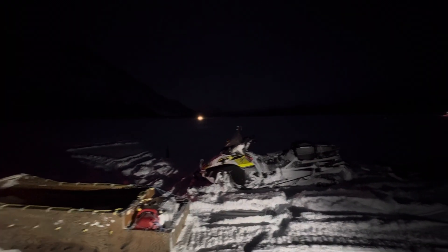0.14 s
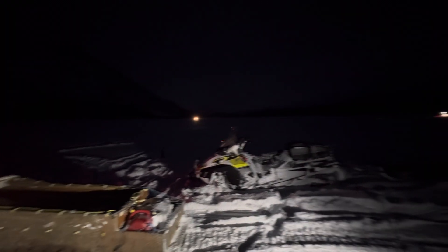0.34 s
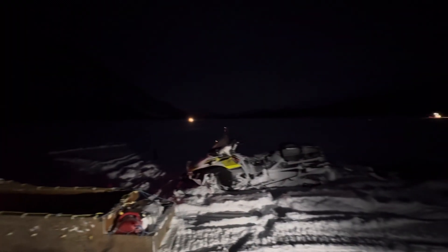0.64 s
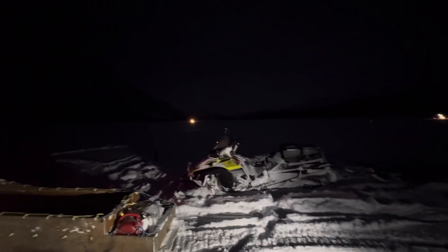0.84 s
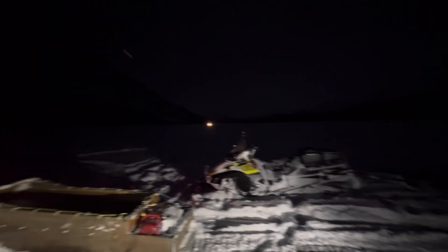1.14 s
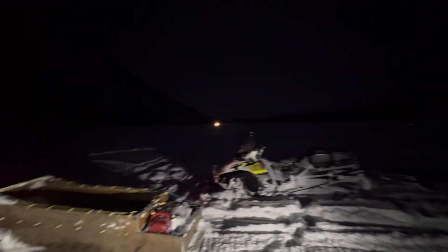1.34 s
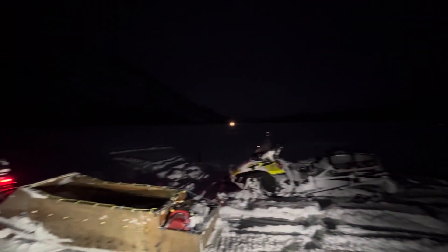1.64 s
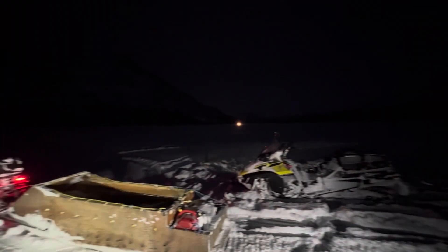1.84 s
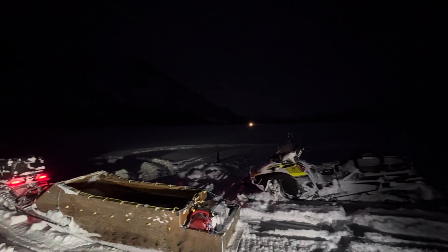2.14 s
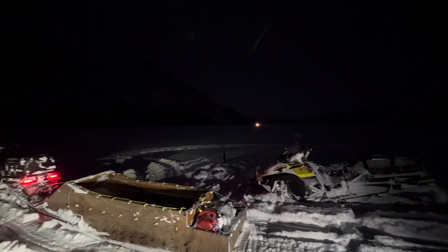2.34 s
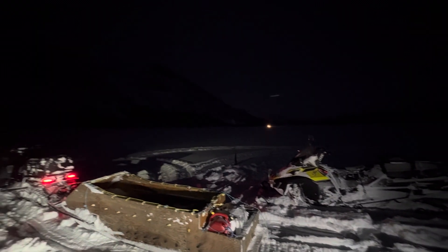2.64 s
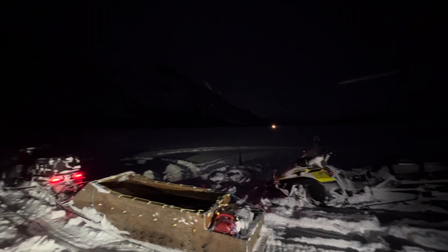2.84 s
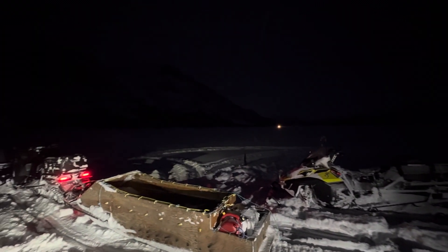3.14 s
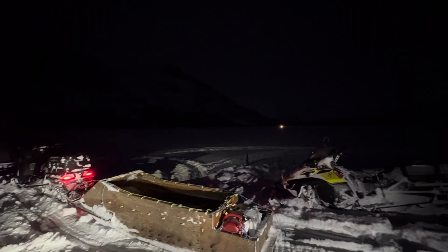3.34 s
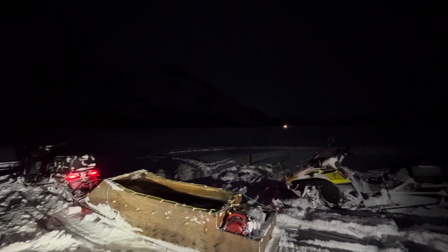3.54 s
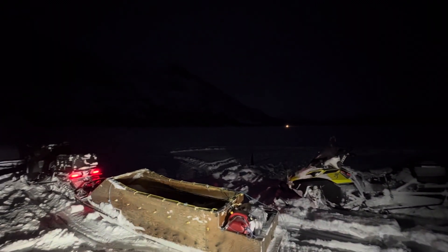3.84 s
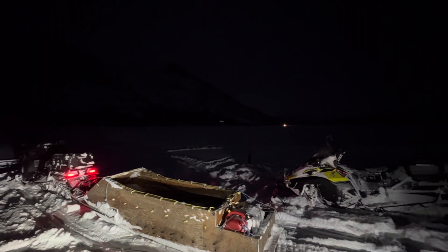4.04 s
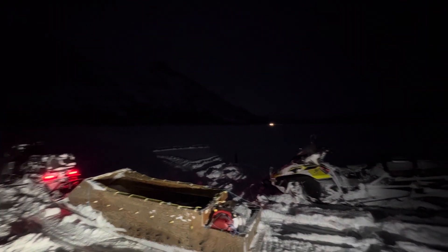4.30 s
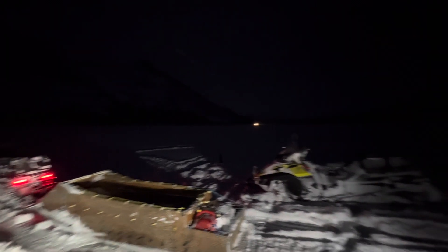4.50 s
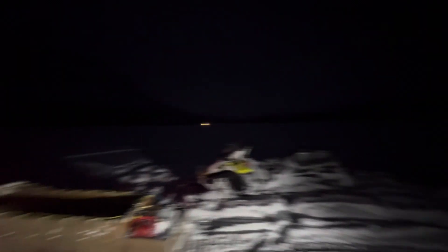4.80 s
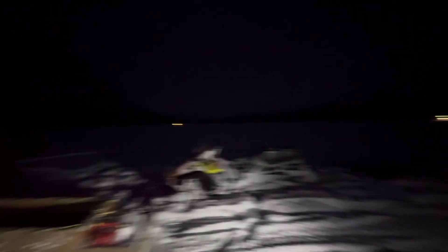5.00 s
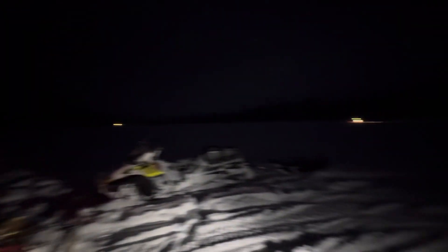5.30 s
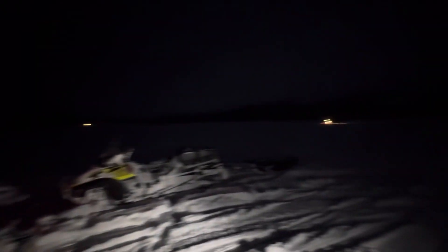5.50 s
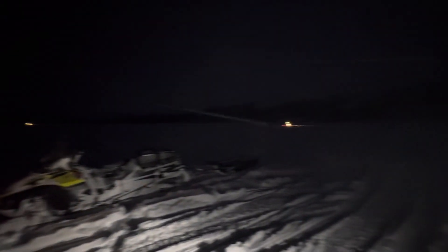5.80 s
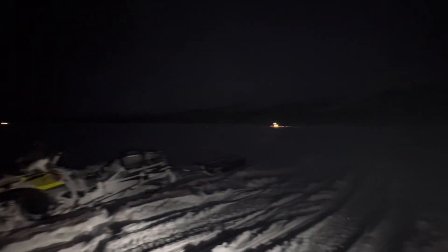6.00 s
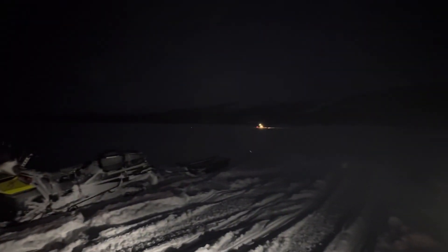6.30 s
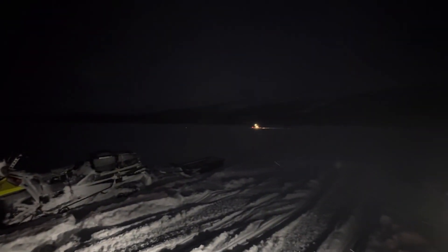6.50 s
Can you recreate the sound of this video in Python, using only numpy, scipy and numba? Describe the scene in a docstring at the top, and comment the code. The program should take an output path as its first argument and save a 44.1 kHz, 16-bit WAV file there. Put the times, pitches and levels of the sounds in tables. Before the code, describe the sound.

A snowmobile idles with a low, steady throb while wind rumbles on the microphone and handling adds scattered taps and dull bumps.

```python
"""A three-cylinder snowmobile idles on open snow at night, some metres from a slowly turning camera.
Its firings drive the exhaust resonances in a low throb and modulate the noise of the engine cover,
the clattering panels and the hissing fan; a valve ticks on every third firing.
Turbulent gusts rumble on the two microphone ports. Something stiff, perhaps a glove or strap,
taps and scuffs the hand-held camera body in irregular runs, among dull bumps."""
import sys
import numpy as np
from scipy import signal
from scipy.io import wavfile
from scipy.ndimage import uniform_filter1d
from numba import njit

SR = 44100
rng = np.random.default_rng(int(sys.argv[2]) if len(sys.argv) > 2 else 0)


def inscribe(sig):
    """Save sig as 16-bit PCM at rate SR to the path in sys.argv[1].

    A 1-D sig is mono; a 2-D sig holds one channel per row.
    Samples are clipped to [-1, 1] before scaling.
    """
    pcm = np.round(np.clip(np.atleast_2d(sig).T, -1, 1) * 32767)
    wavfile.write(sys.argv[1], SR, pcm.astype(np.int16))


N = 293397

# Levels of the exhaust throb and the wind rumble, which swell and fade together:
# (time [s], exhaust level [dB], in-phase wind level [dB])
THROB_AND_RUMBLE = [(0, -25, -28), (.17, -27, -30), (.6, -24, -27), (.8, -21.5, -25), (1.0, -23, -20),
                    (1.36, -24, -21.5), (1.52, -33, -34), (1.85, -29, -35.5), (2.12, -26, -24.5),
                    (2.35, -28.5, -32), (3.4, -33.5, -30), (3.8, -31, -31.5), (4.3, -38, -36),
                    (5.15, -33.5, -38), (5.36, -30, -32.5), (5.46, -31, -31.5), (5.52, -60, -31.5),
                    (5.56, -30.5, -31), (6.08, -29.5, -29), (6.25, -30, -36.5), (6.65, -28, -32.5)]
# Airflow at the ports: (time [s], antiphase wind level [dB], mono bass cutoff [Hz])
PORT_AIRFLOW = [(0, -68, 334), (.85, -31, 226), (1.5, -41.5, 260), (2.9, -44.5, 218), (4.3, -36, 84),
                (5.0, -36.5, 60), (5.4, -25, 41), (5.5, -29, 41), (5.68, -35.5, 604), (5.9, -40.5, 720),
                (6.65, -48, 795)]
# Dull bumps on the camera: (time [s], level [dB], pitch [Hz])
DULL_BUMPS = [(0.922, -13.5, 154), (0.994, -27, 182), (1.112, -14, 87), (1.172, -17, 260),
              (2.796, -23, 360), (3.36, -14.5, 125), (3.506, -22.5, 278), (3.705, -29.5, 335),
              (3.741, -21.5, 485), (3.742, -17, 105.5), (3.813, -28, 610), (3.957, -27, 352),
              (3.976, -29, 583), (3.986, -30.5, 715), (4.058, -33, 537), (4.072, -30.5, 577),
              (4.29, -30.5, 348), (4.618, -24.5, 280), (4.633, -27.5, 400), (5.308, -27, 72),
              (5.355, -28, 79.5), (6.042, -22, 383), (6.423, -23.5, 493), (6.437, -20.5, 530),
              (6.614, -18, 454)]
# Short taps and longer scuffs: (time [s], level [dB], thud gain [dB], treble gain [dB],
# pitch of the hollow under the hand [Hz], contact duration [ms])
TOUCHES = [(2.56, -31, 5.5, -4.5, 807, 5.1), (2.65, -53, 3, -1.5, 800, 21),
           (2.705, -41.5, 16, -11, 1330, 5), (2.724, -37.5, 15, -4, 775, 1.44),
           (2.7445, -43.5, 13.5, -3.5, 610, 4.7), (2.9605, -35.5, 15.5, 2, 510, 5.6),
           (3.124, -58, 11, 4.5, 590, 11), (3.349, -17.5, 8, -5.5, 750, 4.63),
           (3.546, -46.5, 14, -1, 485, 16.8), (3.7581, -29.5, 9.5, -1, 860, 5.2),
           (3.945, -48, 11.5, -1.5, 485, 22), (4.1637, -35, 12, 1, 537, 8.3), (4.346, -34, 4.5, 1, 700, 5),
           (4.493, -37.5, 1, -2, 736, 56), (4.538, -27, 13, -1.5, 680, 4.1),
           (4.711, -50, 10, -3.5, 780, 29), (4.932, -26.5, 8.5, 1, 700, 4.93),
           (5.319, -45, -21, 16.5, 576, 1.9), (5.321, -40.5, -2.5, 2, 1050, 51.6),
           (5.341, -33.5, -9, -8, 1200, 12), (6.203, -46.5, -10, -4, 803, 33)]
# Modes of the camera shell: (frequency [Hz], bandwidth [Hz], gain [dB])
SHELL_LOW_MODES = [(135, 110, -1), (434, 190, 9.5), (721, 110, 6), (1804, 430, 0.5)]
SHELL_MID_MODES = [(2626, 520, 9.1), (3060, 750, 8.3), (4110, 680, 4.7)]
# Treble of the taps, the last row a faint, very high fizz: (frequency [Hz], bandwidth [Hz], gain [dB])
TAP_TREBLE_BANDS = [(5270, 2060, 7.5), (6230, 1130, 9), (8100, 2250, 7.5), (15000, 1100, -3)]
# Engine speed: (time [s], firing rate [Hz])
FIRING_RATE = [(0, 37.45), (1.15, 37.55), (2.2, 38.0), (3.5, 37.5), (4.97, 37.55), (5.25, 37.45),
               (5.6, 36.85), (6.0, 37.2), (6.2, 38.1), (6.65, 38.0)]
# Strength of each cylinder, in firing order: (gain [dB])
CYLINDER_GAINS = [0, 0.43, 0.33]
# Engine levels as the camera turns: (time [s], clatter [dB], tick [dB], whirr [dB], fan [dB], cover [dB])
ENGINE_LEVELS = [(0, -52, -47, -57.5, -60, -44.5), (.13, -62.5, -57.5, -68, -64.5, -50),
                 (.45, -59.5, -53, -70, -61.5, -47), (.7, -57, -45, -76, -61, -51),
                 (1.1, -60, -50, -69, -62.5, -48), (1.3, -62.5, -70, -66, -62.5, -49.5),
                 (2.1, -66.5, -66, -65.5, -62.5, -49), (3.0, -68.5, -64, -63.5, -59.5, -49.5),
                 (4.3, -68, -79, -61.5, -60.5, -49.5), (5.0, -55, -42.5, -63.5, -57, -46),
                 (5.55, -54.5, -46, -80, -57, -52.5), (5.9, -54, -46.5, -65.5, -55, -53),
                 (6.65, -53.5, -45.5, -67, -54, -44.5)]
# Resonances and noise bands of the engine: (frequency [Hz], bandwidth [Hz], gain [dB])
HISS_BANDS = [(5560, 1000, 1.5), (6200, 1300, -0.5), (7360, 7800, -3), (9650, 1900, -0.5)]
WHIRR_BANDS = [(3500, 3600, 0)]  # low band of the fan
COVER_MODES = [(500, 405, 1), (750, 310, -4.5)]
PANEL_MODES = [(1620, 900, -2), (1910, 1000, 2.5), (2520, 990, -4.5)]
VALVE_MODES = [(1950, 300, -7), (2400, 260, 0)]
BRACKET_MODES = [(3706, 120, 0)]  # higher ring of the tick
EXHAUST_MODES = [(34.8, 9.1, -14), (77.6, 23, -3), (116.86, 13.4, -2.5), (152.4, 39.5, -10),
                 (231.3, 55, -9), (299, 51, -24)]
# Five sections of a tenth-order Butterworth filter: (damping [1])
DAMPINGS = 2 * np.cos(np.pi * np.arange(1, 10, 2) / 20)

PORT_LAG_MS = 0.44
TIME = np.arange(N) / SR


def undb(db):
    """Decibels to amplitude ratio."""
    return 10 ** (np.asarray(db) / 20)


def level(x, db):
    """Normalise to unit rms, then apply a gain in dB."""
    return x * undb(db) / np.sqrt(np.mean(x ** 2))


def curves(table):
    """Linear interpolation of each column over time, one value per sample."""
    times, *columns = np.transpose(table)
    return [np.interp(TIME, times, column) for column in columns]


def butterworth(x, order, hz, kind="low"):
    """Filter with a maximally flat passband."""
    return signal.sosfilt(signal.butter(order, hz, kind, fs=SR, output="sos"), x)


@njit
def svf(x, hz, width):
    """Two integrators in a loop form a tunable resonator: returns band-pass and low-pass."""
    band, low = np.empty(len(x)), np.empty(len(x))
    band_state, low_state = 0., 0.
    for i in range(len(x)):
        g, damping = np.tan(np.pi * hz[i] / SR), width[i] / hz[i]
        v = (band_state + g * (x[i] - low_state)) / (1 + g * (g + damping))
        low[i], band[i] = low_state + g * v, damping * v
        band_state, low_state = 2 * v - band_state, low_state + 2 * g * v
    return band, low


def ring(x, modes):
    """Modal superposition: each mode is two like resonators in series, each of the listed bandwidth."""
    out = 0
    for hz, width, db in modes:
        b, a = signal.iirpeak(hz, hz / width, SR)
        out = out + undb(db) * signal.lfilter(b, a, signal.lfilter(b, a, x))
    return out


def wander(rate_hz):
    """Smooth random fluctuation: held values, averaged twice."""
    hold = int(SR / rate_hz)
    steps = np.repeat(rng.standard_normal(N // hold + 1), hold)
    return 1.64 * uniform_filter1d(uniform_filter1d(steps, hold), hold)[:N]


def pan(db):
    """Level difference between the ports; positive favours the left."""
    return undb(np.array([[db], [-db]]) / 2)


def ports(x, lag_ms=PORT_LAG_MS):
    """Path difference: the same wave reaches the left port later."""
    return np.array([np.interp(TIME - lag_ms / 1000, TIME, x), x])


def diffuse(make, db, direct_share, lag_ms=PORT_LAG_MS):
    """Direct sound, coherent at the ports, adds in power to scattered sound, which is incoherent."""
    direct, left, right = [level(make(), db) for _ in range(3)]
    scattered = np.array([left, right])
    return np.sqrt(direct_share) * ports(direct, lag_ms) + np.sqrt(1 - direct_share) * scattered


def ringing_noise(envelope, modes):
    """Forced response of resonances to amplitude-modulated white noise."""
    return ring(envelope * rng.standard_normal(N), modes)


def eddies(edge_hz, lumps_db, floor_hz):
    """Turbulent pressure: lumpy noise whose spectrum slopes gently, then falls steeply at an edge."""
    pressure = undb(lumps_db * wander(70)) * rng.standard_normal(N)
    _, pressure = svf(pressure, 0.37 * edge_hz, edge_hz)
    for damping in DAMPINGS:
        _, pressure = svf(pressure, edge_hz, damping * edge_hz)
    pressure = butterworth(pressure, 2, floor_hz, "high")
    return level(pressure / np.sqrt(edge_hz), 0)


def wind(early_hz=339.5, late_hz=898, opens_s=5.56, opening_s=0.3):
    """Turbulence drives the ports partly in phase, partly in antiphase; its upper edge climbs once."""
    since_s = np.maximum(TIME - opens_s, 0)
    edge_hz = late_hz + (early_hz - late_hz) * np.exp(-since_s / opening_s)
    common = eddies(edge_hz, lumps_db=1.82, floor_hz=58.4) * undb(curves(THROB_AND_RUMBLE)[1])
    opposed = eddies(2.26 * edge_hz, lumps_db=1.9, floor_hz=90) * undb(curves(PORT_AIRFLOW)[0])
    return np.array([common + opposed, common - opposed])


def bumps(rise_cycles=0.67):
    """Damped oscillation: soft knocks near the left port ring for a few cycles."""
    out, t = np.zeros(N), np.arange(int(.1 * SR)) / SR
    for start_s, db, hz in DULL_BUMPS:
        age = t * hz / rise_cycles
        overtone = 1.04 * np.sin(2 * np.pi * 1.46 * hz * t) * np.exp(-age)
        bump = age * np.exp(1 - age) * (np.sin(2 * np.pi * hz * t) + overtone)
        bump = butterworth(bump, 4, 2.03 * hz)
        i = int(start_s * SR)
        out[i:i + len(t)] += (undb(db) * bump)[:N - i]
    return out * pan(7.9)


def gripped(grit, force, modes, detune=0.04, slip_power=1.5):
    """Resonant filtering of grit: each grip shifts the bands, and the force sets the energy."""
    shifts = 1 + detune * rng.uniform(-1.16, 1, len(modes))
    modes = [(hz * shift, width, db) for (hz, width, db), shift in zip(modes, shifts)]
    sound = ring(grit, modes)
    impulse_response = ring(signal.unit_impulse(len(force)), modes)
    energy = 2 * slip_power * np.sum(force ** 2) * np.sum(impulse_response ** 2)
    return sound * np.sqrt(energy / np.sum(sound ** 2))


def contacts(settle_db=-19, settle_ms=13):
    """Stick-slip friction: each tap or scuff grinds for a moment, then dies away in the shell."""
    out, t_ms = np.zeros((2, N)), np.arange(int(.2 * SR)) / SR * 1000
    n = len(t_ms)
    for time_s, db, thud_db, treble_db, hollow_hz, contact_ms in TOUCHES:
        rise_ms, fall_ms = min(6.5, contact_ms), min(0.41 * contact_ms, 8.8)
        after_ms = np.maximum(t_ms - contact_ms, 0)
        release = np.exp(-after_ms / fall_ms) + undb(settle_db) * np.exp(-after_ms / settle_ms)
        force = np.minimum(t_ms / rise_ms, 1) ** 2 * release
        noise = rng.standard_normal((3, n))
        friction = noise[0] + .5 * noise[1:]  # mostly alike at the two ports
        slips = undb(3 * np.repeat(rng.standard_normal(n), 30)[:n])
        cutoff_hz = 16000 - 210 * min(contact_ms, 36)  # longer contacts are duller
        grit = butterworth(force * slips * friction, 4, cutoff_hz)
        hollow_mode = (hollow_hz, 200, 9)
        thud = undb(thud_db) * gripped(grit, force, SHELL_LOW_MODES + [hollow_mode]) * pan(2.8)
        scrape = gripped(grit, force, SHELL_MID_MODES) * pan(-8.0)
        scrape += undb(treble_db) * gripped(grit, force, TAP_TREBLE_BANDS)
        # the left port is reached a few samples later
        scrape[0], thud[0] = np.roll(scrape[0], 1), np.roll(thud[0], 5)
        i = int((time_s - rise_ms / 2000) * SR)
        out[:, i:i + n] += (undb(db) * (thud + scrape))[:, :N - i]
    return out


def cooling_fan(flutter, hiss_db, whirr_db):
    """Broadband flow noise: a high hiss and a lower whirr, both modulated by the firings."""
    hiss = diffuse(lambda: sum(ringing_noise(flutter, [band]) for band in HISS_BANDS),
                   hiss_db, direct_share=0.43, lag_ms=0.033)
    whirr = diffuse(lambda: ringing_noise(flutter, WHIRR_BANDS), whirr_db, direct_share=0.37, lag_ms=0.016)
    return hiss + whirr


def bodywork(shake, modes, db, direct_share):
    """Forced vibration: cover or panels, shaken by each firing, radiate noise at their modes."""
    return diffuse(lambda: ringing_noise(shake, modes), db, direct_share)


def valve(firing_hz, db, modes, first_s=0.027, scatter_db=2.5):
    """Impact excitation: metal rings from one blow of uneven strength on every third firing."""
    firings = np.cumsum(firing_hz) / SR
    turns = (firings - firings[int(first_s * SR)]) // len(CYLINDER_GAINS)
    hits = np.flatnonzero(np.diff(turns)) + 1
    blows = np.zeros(N)
    blows[hits] = undb(db[hits] + scatter_db * rng.standard_normal(len(hits)))
    tick = ring(signal.unit_impulse(SR // 50), modes)
    return np.convolve(blows, tick / np.abs(tick).max())[:N]


def rasp(db=-62, ends_s=0.13):
    """Rough noise excites the upper valve resonance briefly at the start."""
    roughness = undb(4 * wander(120)) * rng.standard_normal(N)
    burst = roughness / (1 + (TIME / ends_s) ** 8)
    bandwidth_gain = np.sqrt(SR / VALVE_MODES[1][1] / 2)
    return undb(db) * bandwidth_gain * ring(burst, VALVE_MODES[1:])


@njit
def fire(hz, rate_factors, sizes):
    """Quasi-periodic pulse train: each cycle has its own rate and strength, and fires as phase wraps."""
    pulses, phases, strengths = np.zeros(len(hz)), np.empty(len(hz)), np.empty(len(hz))
    phase, cycle = 0., 0
    for i in range(len(hz)):
        phase += hz[i] * rate_factors[cycle] / SR
        if phase >= 1:
            phase, cycle = phase - 1, cycle + 1
            pulses[i] = sizes[cycle]
        phases[i], strengths[i] = phase, sizes[cycle]
    return pulses, phases, strengths


def exhaust(pulses, muffler_hz=380):
    """Source and filter: the muffler rounds off each puff, and the puffs ring the exhaust modes."""
    puffs = butterworth(pulses, 2, muffler_hz)
    return ports(level(ring(puffs, EXHAUST_MODES), curves(THROB_AND_RUMBLE)[0]))


def snowmobile(distance_cutoff_hz=11000):
    """Common excitation: one firing rhythm drives exhaust, cover, panels, valve and fan flutter."""
    firing_hz, = curves(FIRING_RATE)
    clatter_db, tick_db, whirr_db, hiss_db, cover_db = curves(ENGINE_LEVELS)
    swell_db = 4.5 * np.exp(-((TIME - 2.084) / 0.091) ** 2)  # the hiss swells briefly
    hiss_db, whirr_db = hiss_db + swell_db, whirr_db + swell_db
    jitter, puff_scatter, knock_scatter = rng.standard_normal((400, 3)).T
    puff_sizes = undb(1.1 * puff_scatter + np.resize(CYLINDER_GAINS, len(jitter)))
    pulses, phase, _ = fire(firing_hz, 1 + 0.0059 * jitter, puff_sizes)
    _, _, knock = fire(firing_hz, 1 + 0.006 * jitter, undb(3.2 * knock_scatter))
    shake = (1.1 + knock * np.exp(-phase / 0.15)) * undb(1.3 * wander(9))
    flutter = (1 + 0.37 * knock * np.exp(-phase / 0.52)) * undb(wander(4.7))
    cover = bodywork(shake, COVER_MODES, cover_db, direct_share=0.42)
    clatter = bodywork(shake, PANEL_MODES, clatter_db, direct_share=0.55)
    fan = cooling_fan(flutter, hiss_db, whirr_db)
    ticks = valve(firing_hz, tick_db, VALVE_MODES) + valve(firing_hz, whirr_db + 8.5, BRACKET_MODES)
    shaded = (clatter + ports(ticks + rasp())) * pan(-1.7)  # the camera body shades the left port
    return butterworth(exhaust(pulses) + cover + shaded + fan, 6, distance_cutoff_hz)


def mono_bass(sound, cutoff_hz):
    """Mid-side filtering: the camera removes the difference of the ports below a moving cutoff."""
    mid, side = (sound[0] + sound[1]) / 2, (sound[0] - sound[1]) / 2
    for damping in DAMPINGS:
        band, low = svf(side, cutoff_hz, damping * cutoff_hz)
        side = side - band - low
    return np.array([mid + side, mid - side])


def scene():
    """Superposition of engine, wind and handling noise at the two ports."""
    return mono_bass(snowmobile() + wind() + contacts() + bumps(), curves(PORT_AIRFLOW)[1])


def record(dry, bass_hz=33, treble_hz=10120, fizz_from_hz=13800, top_hz=16000):
    """Band limiting: deep bass and top treble are cut; taps keep a faint, very high fizz."""
    dry = butterworth(dry, 6, bass_hz, "high")
    main_band = signal.sosfiltfilt(signal.butter(8, treble_hz, fs=SR, output="sos"), dry)
    fizz = signal.sosfiltfilt(signal.butter(6, fizz_from_hz, "high", fs=SR, output="sos"), dry)
    top_cut = signal.ellip(8, .2, 70, top_hz, fs=SR, output="sos")
    return signal.sosfilt(top_cut, main_band + undb(2) * fizz)


dry = scene()
out = record(dry)
inscribe(out)
```